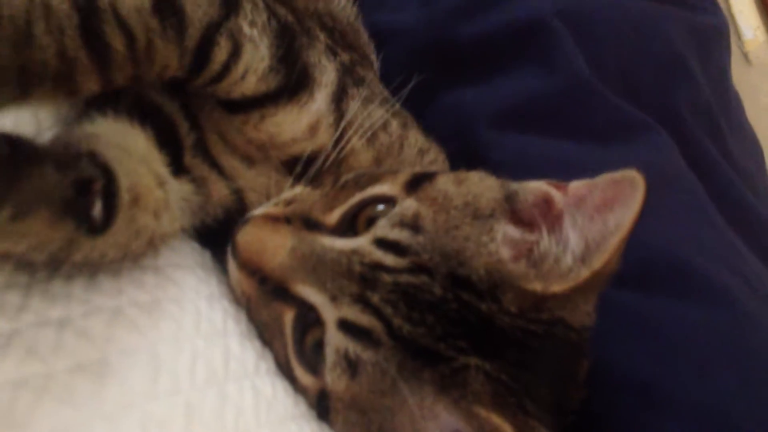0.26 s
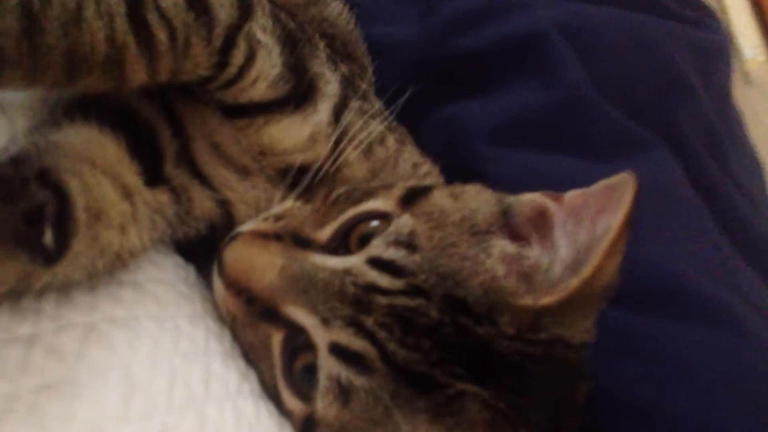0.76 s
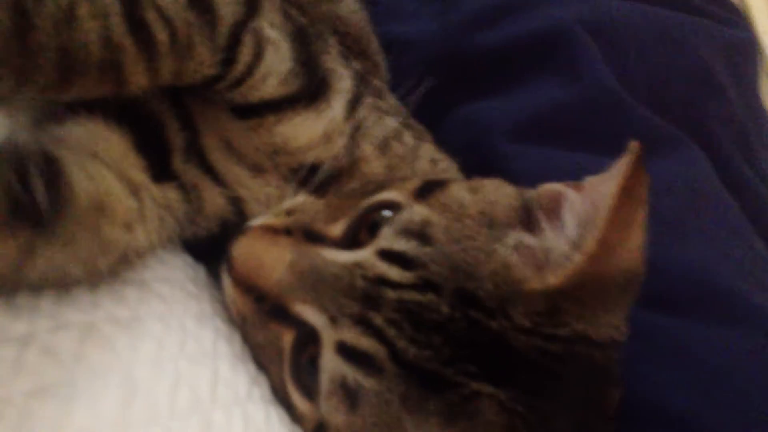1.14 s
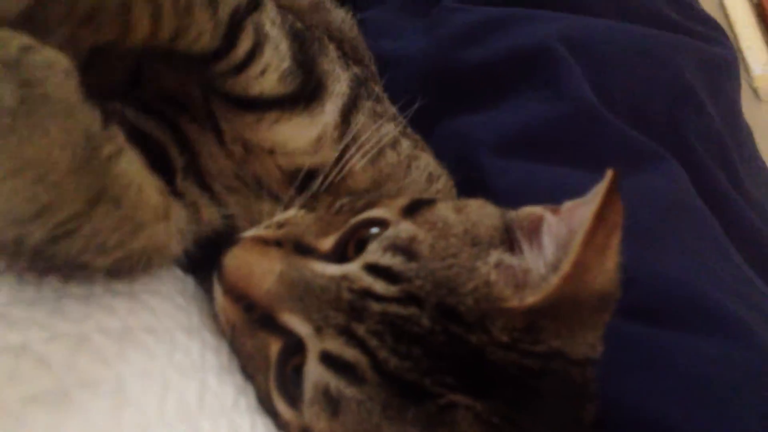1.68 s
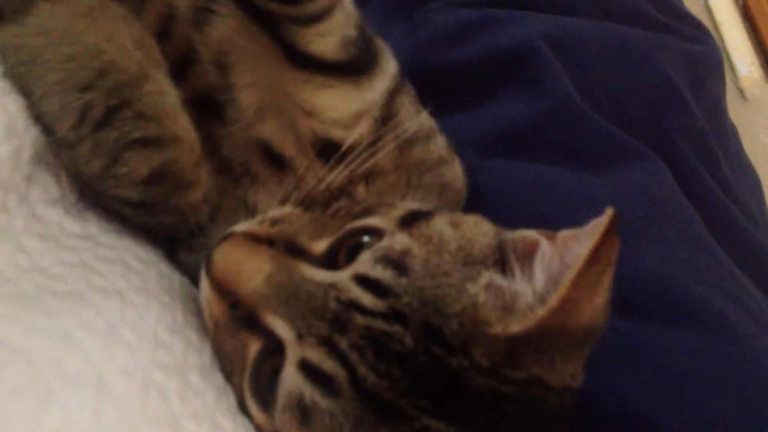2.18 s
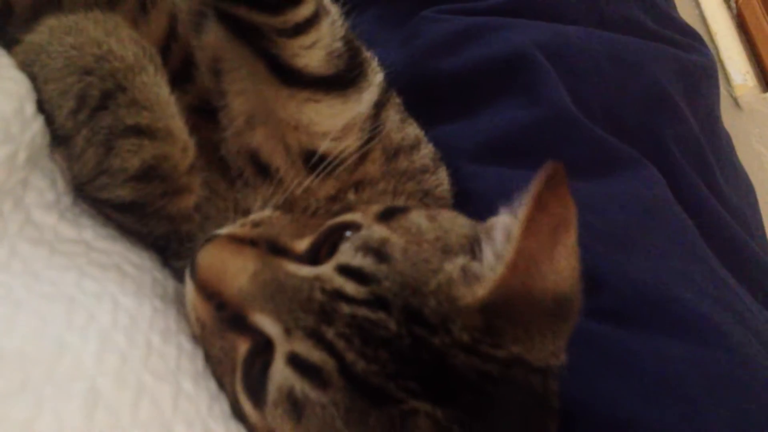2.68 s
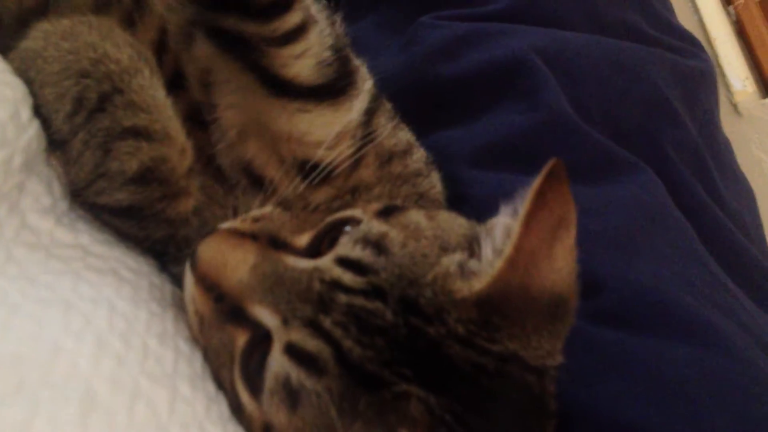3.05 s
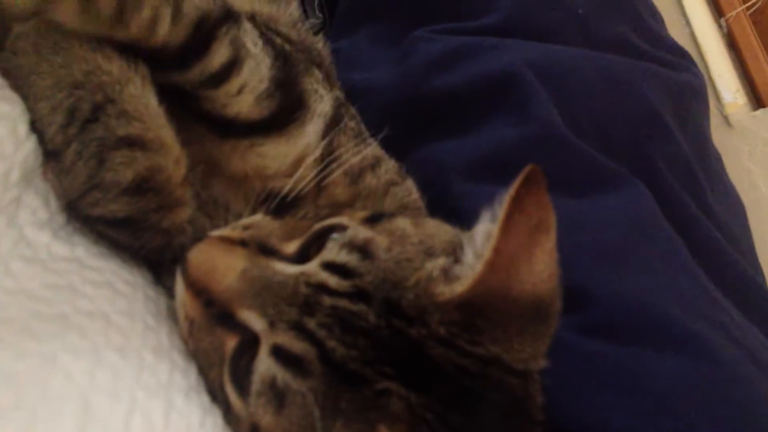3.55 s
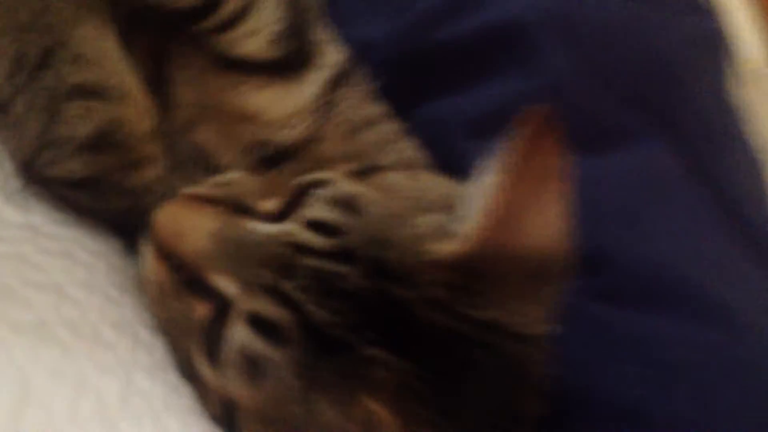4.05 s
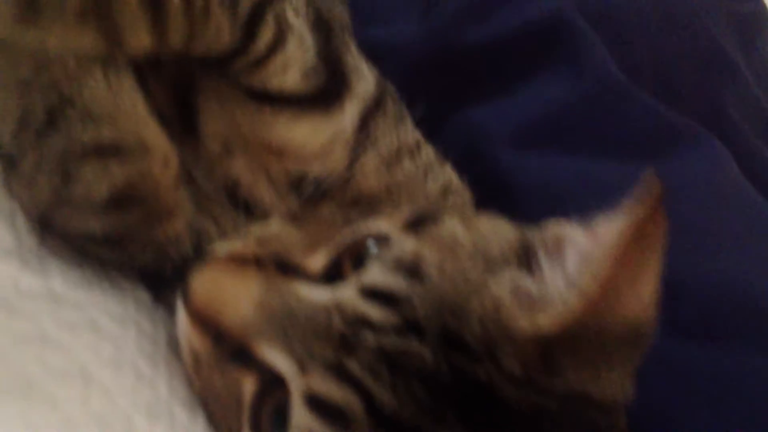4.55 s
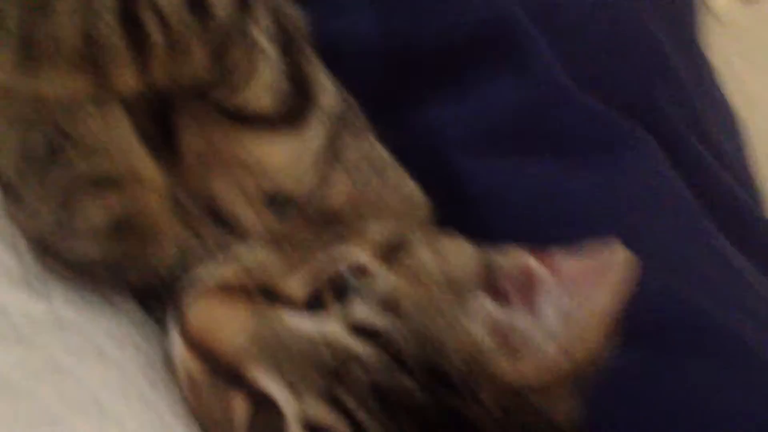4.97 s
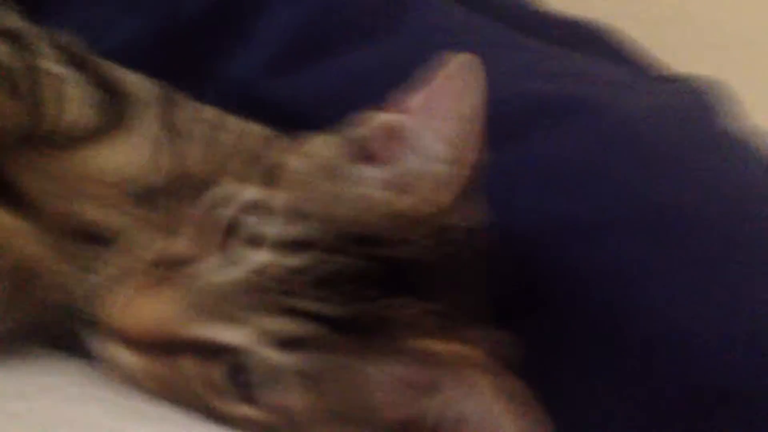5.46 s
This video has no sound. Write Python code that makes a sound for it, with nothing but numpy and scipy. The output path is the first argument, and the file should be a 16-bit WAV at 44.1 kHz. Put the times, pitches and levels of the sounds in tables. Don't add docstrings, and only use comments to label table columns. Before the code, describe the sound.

A kitten purrs steadily close up on a bed while seven sharp dry clicks run by, then a loud hard plastic knock rattles near the end.

```python
import sys
import numpy as np
from scipy import signal
from scipy.fft import rfft, irfft, next_fast_len
from scipy.io import wavfile
from scipy.ndimage import uniform_filter1d, map_coordinates

SR = 44100
rng = np.random.default_rng(int(sys.argv[2]) if len(sys.argv) > 2 else 0)


def amplitude_ratio(level_db):
    exponent = np.asarray(level_db, float) / 20
    return 10 ** exponent


def wav_out(sig):
    wavfile.write(sys.argv[1], SR, np.round(np.clip(np.atleast_2d(sig).T, -1, 1) * 32767).astype(np.int16))


N = 252428


def unit(x):
    return x / np.sqrt(np.mean(x ** 2) + 1e-20)


def unit_gain(y, x):
    return unit(y) * np.sqrt(np.mean(x ** 2))


def along(points, hz):
    f, v = np.transpose(points)
    return np.interp(np.log(hz + 1), np.log(f + 1), v)


def at(rows, times):
    s, *cols = np.transpose(rows)
    return [np.interp(times, s, c) for c in cols]


def filtered(x, response):
    m = next_fast_len(N + SR // 2)
    return irfft(rfft(x, m) * response(np.fft.rfftfreq(m, 1 / SR)), m)[..., :N]


def tract(peaks):
    return lambda f: sum((-1) ** k * amplitude_ratio(db) * 1j * f * w / (c * c - f * f + 1j * f * w)
                         for k, (c, w, db) in enumerate(peaks))


def cavity(peaks):
    return lambda f: sum((-1) ** k * amplitude_ratio(db) * c * w / (c * c - f * f + 1j * f * w)
                         for k, (c, w, db) in enumerate(peaks))


def pulses(times, sizes):
    return np.bincount(np.clip(times * SR, 0, N - 1).astype(int), sizes, N)


def ring(modes, t):
    x = 0
    for hz, t60, db in modes:
        decay = amplitude_ratio(db + rng.normal(0, 2) - 60 * t / t60)
        x = x + decay * np.sin(2 * np.pi * hz * rng.normal(1, .025) * t)
    return x / np.abs(x).max()


def add(out, s, x):
    out[round(s * SR):][:len(x)] += x


# (first throat cycle [s], throat rate [cycles per s], voiced length [s], roughness [0-1])
BREATHS = [
    (.0293, 27.97, .36, .15),
    (.4968, 30.67, .59, .25),
    (1.1505, 29.36, .58, .17),
    (1.829, 30.6, .52, .3),
    (2.451, 30.05, .47, .17),
    (3.0768, 31.5, .5, .55),
    (3.6548, 29.35, .48, .15),
    (4.2632, 31.04, .51, .65),
    (4.8736, 28.99, .46, .5),
    (5.5604, 28.3, .3, .5),
]
# (effort at start [dB], effort at end [dB], snap over thump [dB], nasal edge [dB])
VOICE = [(-66, -64, -6, -5), (-74, -70.5, -2, -2), (-65.5, -64, -5.5, -6), (-80, -76, 0.5, -6),
         (-63.5, -68.5, -3.5, -16), (-64, -71.5, -6.5, -2.5), (-68, -62, -4, -18), (-63.5, -64, -7, -2),
         (-64, -59, -9, -15), (-66.5, -60, -5, -7)]


def breathing():
    attack_s, release_s, pause_db = 0.025, 0.042, -18
    onset_snap_db = -2
    rows, shut = [], []
    for k, (breath, voice) in enumerate(zip(BREATHS, VOICE)):
        s, rate, length, rough = breath
        first_db, last_db, snap_db, edge_db = voice
        turn = BREATHS[k + 1][0] if k + 1 < len(BREATHS) else N / SR
        shut.append(np.arange(s, turn - .5 / rate, 1 / rate))
        corners = [(s - attack_s, first_db + pause_db),
                   (s, first_db),
                   (s + length, last_db),
                   (min(s + length + release_s, turn - attack_s), last_db + pause_db)]
        for when, db in corners:
            firm_db = db + snap_db + onset_snap_db * (when <= s)
            rows.append((when, (-1) ** k, rough, db, firm_db, edge_db))
    return rows, np.concatenate(shut)


# (frequency [Hz], width [Hz], level [dB])
CHEST = [(219.3, 105, 0), (313, 95, -2.5)]
THROAT = [(613, 626, 0), (891, 350, -7.5)]
NOSE = [(1204, 230, -6), (1750, 670, -0.5)]
# (time [s], snap level [dB], thump relative to snap [dB])
FLAPS = [(0.238, -53, -8), (0.347, -53, -5), (2.459, -54.5, 1), (2.514, -50, -14), (3.063, -46, -29),
         (3.075, -57, -2), (3.155, -60, -11), (3.281, -49.5, -15), (3.317, -50.5, -4), (4.285, -57, 3),
         (4.312, -47, -3), (4.344, -52, -13), (4.47, -48, -5), (4.499, -50.5, -9), (4.576, -51, -4),
         (4.599, -51.5, -6), (4.625, -57, 2), (4.734, -53, -1), (5.275, -54, -2), (5.291, -42.5, -3),
         (5.306, -46, -15), (5.355, -46, -13), (5.588, -56, -19), (5.613, -52, -19)]


def purr():
    rows, shut = breathing()
    flow, rough = at(rows, shut)[:2]
    d = rng.uniform(-1, 1, (len(shut), 8))
    part = shut - .0132 + .0007 * d[:, 0]
    shut = shut - .0012 + (.0005 + .0015 * rough) * d[:, 1]
    stray = shut + .011 + .007 * d[:, 2]
    size = amplitude_ratio((2.2 + 3 * rough[:, None]) * d[:, 3:7]).T
    slip = pulses(stray, 1.2 * rough * d[:, 7])
    soft = pulses(part, flow * size[0]) - 0.55 * pulses(shut, flow * size[1]) + slip
    hard = 0.5 * pulses(part, flow * size[2]) - pulses(shut, flow * size[1]) + slip
    edge = pulses(shut, size[3] * size[1]) + 0.72 * pulses(part, size[0]) + slip
    thump_db, snap_db, edge_db = at(rows, np.arange(N) / SR)[2:]

    when, flap_db, low_db = np.transpose(FLAPS)
    nasal_db = np.where(at(rows, when)[0] > 0, -20, -13)
    when = when + .002
    soft = amplitude_ratio(thump_db + 25.5) * unit(soft) - pulses(when, amplitude_ratio(flap_db + low_db + 42))
    hard = amplitude_ratio(snap_db + 20) * unit(hard) - pulses(when, amplitude_ratio(flap_db + 32))
    edge = amplitude_ratio(snap_db + edge_db + 8.5) * unit(edge) + pulses(when, amplitude_ratio(flap_db + nasal_db + 28.5))

    puff = uniform_filter1d(np.abs(edge), size=300) * rng.standard_normal(N)
    edge = 0.55 * edge + 20 * puff
    thump = filtered(soft, cavity(CHEST))
    snap = filtered(hard, lambda f: cavity(THROAT)(f) / (1 + 1j * f / 2200))
    return thump + snap + filtered(edge, cavity(NOSE))


# (time [s], peak level [dB], hollow pitch [Hz], hollow level [dB])
CLICKS = [
    [(1.1457, -36, 1050, -41), (1.1465, -15, 560, -39.5), (1.1506, -34, 670, -53)],
    [(1.299, -30, 1000, -39.5), (1.303, -26, 880, -52), (1.3052, -29, 700, -57)],
    [(1.4447, -28, 840, -39), (1.449, -19, 400, -42.5)],
    [(1.5822, -32, 900, -43.5), (1.5842, -27, 620, -47), (1.587, -25, 316, -40)],
    [(1.7188, -31, 1020, -41), (1.7223, -12, 800, -42)],
    [(1.8636, -27, 980, -36), (1.8682, -16.5, 554, -39)],
    [(2.0166, -33, 1184, -46), (2.0187, -31, 1140, -42.5), (2.0196, -32, 1190, -46),
     (2.0252, -40, 1160, -37)],
]
# (hiss level [dB], middle cavity level [dB], bright cavity pitch [ratio])
OPENING = [(-42, 2, .92), (-43, -0.5, .97), (-45, 1.5, .96), (-39, 2.5, 1.03), (-36, 2.5, 1.02),
           (-38, 5.5, 1.01), (-49, -1, 1.01)]
# (frequency [Hz], t60 [s], level [dB])
BRIGHT = [(7350, .0045, 0), (8900, .003, -2), (10600, .0025, -4), (13000, .0015, -13)]
MIDDLE = [(2150, .0035, -7), (2700, .005, 0), (4100, .003, -3)]
# (frequency [Hz], width [Hz], level [dB])
SPRAY = [(1120, 340, -3.5), (2970, 1200, -9), (7300, 1700, 1), (10350, 2700, 3.5)]


def clicks():
    build_s, hiss_s = .0002, .0052
    leak_db_per_s = -1100
    out, hiss, t = np.zeros(N + SR), np.zeros(N + SR), np.arange(SR // 25) / SR
    onset = np.minimum(t / .0001, 1)
    build = np.sin(np.pi / 2 * np.minimum(t / build_s, 1))
    for releases, (suction_db, cavity_db, pitch) in zip(CLICKS, OPENING):
        for s, db, hz, hollow_db in releases:
            cycles = 14.3 if hz > 1000 else 6.2
            hollow = amplitude_ratio(hollow_db - db - 60 * t * hz / cycles) * np.sin(2 * np.pi * hz * t)
            mid_db = cavity_db + 0.5 - 0.54 * (db + 36)
            middle = amplitude_ratio(mid_db) * ring(MIDDLE, t)
            bright = amplitude_ratio(-2.8) * build * ring(BRIGHT, pitch * (t - build_s))
            add(out, s, amplitude_ratio(db + 2.5) * onset * (middle + hollow - bright))
            hiss_db = suction_db + leak_db_per_s * (s - releases[0][0])
            add(hiss, s, amplitude_ratio(hiss_db - 3 - 60 * (t / hiss_s) ** 4) * rng.standard_normal(len(t)))
    return out[:N] + unit_gain(filtered(hiss[:N], tract(SPRAY)), hiss[:N])


# (frequency [Hz], level [dB])
SPREAD = [(200, -41), (1000, -18), (2700, -5), (4500, 0.5), (5800, -7), (7400, 2), (10000, -3.5),
          (14000, -10)]


def sideways_clicks():
    s, db = np.concatenate(CLICKS).T[:2]
    return filtered(pulses(s, amplitude_ratio(db)), lambda f: amplitude_ratio(along(SPREAD, f)))


# (time [s], peak level [dB], thud level [dB])
KNOCK = [
    (5.4743, -7, -33),
    (5.478, -20.5, 2),
    (5.4826, -13, -3.5),
    (5.488, -22, -5.5),
    (5.4901, -19, -18),
    (5.4966, -17, -18),
    (5.5035, -28, 1),
]
# (frequency [Hz], t60 [s], level [dB])
CASE = [(1560, .016, -7), (2150, .009, -3), (2830, .011, 0), (3220, .01, -1), (4300, .009, -3),
        (7200, .003, -17), (10500, .002, -20)]
THUD = [(196, 0.024, -5.5), (267.7, 0.045, 2.5), (420, 0.017, -20), (677, 0.0094, -5.5), (1120, 0.01, -2.5)]
# (time [s], peak level [dB], body pitch [Hz], edge pitch [Hz])
TICKS = [
    (0.5485, -44.5, 695, 2600),
    (2.7, -69, 8500, 9500),
    (3.47, -62.5, 7300, 7000),
    (3.555, -59, 8000, 9000),
    (4.8855, -47, 3500, 6500),
    (5.5357, -42.5, 4030, 7400),
]


def knock():
    out, t = np.zeros(N + SR), np.arange(SR // 12) / SR
    onset = np.minimum(t / 0.00052, 1)
    for s, db, thud_db in KNOCK:
        scrape = uniform_filter1d(uniform_filter1d(rng.standard_normal(len(t)), size=5), size=4)
        scrape = 0.2 * amplitude_ratio(-60 * t / 0.027) * scrape
        case = amplitude_ratio(-3.5) * ring(CASE, t - .0004)
        thud = amplitude_ratio(thud_db - 1.5) * ring(THUD, t)
        add(out, s, amplitude_ratio(db) * (case + thud + scrape) * onset)
    for s, db, *pitches in TICKS:
        for hz in pitches:
            add(out, s, -amplitude_ratio(db + 5 - 60 * t * hz / 2.9) * np.sin(2 * np.pi * hz * t))
    return out[:N]


# (peak time [s], level [dB], 20 dB rise [s], 20 dB fall [s], fineness [dB])
STROKES = [
    (2.22, -75.5, 0.4, 0.15, 5.5),
    (4.89, -75, 0.13, .9, 2),
    (5.09, -67, 0.16, .2, -2.5),
    (5.23, -70, 0.2, 0.04, 3.5),
    (5.31, -75, .5, 0.3, -3),
]
# (frequency [Hz], level [dB per Hz])
CLOTH = [(250, -120), (400, 4), (800, 2.5), (1450, -4), (1580, 6), (1720, -4), (2450, -4.5), (3200, -7),
         (4400, 2.5), (5800, -12), (7300, -6.5), (10000, -23.5), (13000, -17), (16500, -24)]
# (from [Hz], to [Hz])
SCALES = [(0, 3200), (3200, 8000), (8000, 20000)]


def rustle():
    t = np.arange(N) / SR
    end = STROKES[-1][0] + STROKES[-1][3]

    def swell(tilt):
        power = 0
        for s, db, rise, fall, fine_db in STROKES:
            away = np.where(t < s, (s - t) / rise, (t - s) / fall)
            power = power + amplitude_ratio(db + tilt * fine_db - 20 * away) ** 2
        return np.sqrt(power * (t < end))

    clumps = amplitude_ratio(1.5 * map_coordinates(rng.standard_normal(N // 300 + 4), [np.arange(N) / 300]))
    slips = clumps * rng.standard_normal(N) * amplitude_ratio(4 * rng.standard_normal(N))
    out = 0
    for (low, high), db, tilt in zip(SCALES, (6, 2.5, -2.5), (-1.2, 0, 1)):
        band = filtered(slips, lambda f: amplitude_ratio(along(CLOTH, f)) * (f >= low) * (f < high))
        out = out + amplitude_ratio(db) * swell(tilt) * unit(band)
    return out


# (frequency [Hz], t60 [s])
BEDROOM = [(200, 0.27), (2000, 0.45), (7000, 0.31), (14000, 0.24)]


def bedroom(x):
    out = np.zeros(N + SR)
    for a in range(0, N, SR // 7):
        hz, t, z = signal.stft(rng.standard_normal(SR // 2), SR, nperseg=256)
        decay = amplitude_ratio(-60 * t / along(BEDROOM, hz)[:, None])
        tail = signal.istft(z * decay, SR, nperseg=256)[1]
        echoes = signal.fftconvolve(x[a:a + SR // 7], tail / np.linalg.norm(tail))
        add(out, a / SR + .006, echoes)
    return out[:N]


# (frequency [Hz], level [dB per Hz])
HISS = [(15, -70), (25, -36), (43, -28.5), (69, -20), (193, 0), (322, -5), (433, -18), (703, -12.5),
        (1140, -17), (1800, -20), (2420, -20.5), (7910, -22), (9810, -28.5), (13900, -23.5), (15500, -25)]


def background():
    return amplitude_ratio(-67.9) * unit(filtered(rng.standard_normal(N), lambda f: amplitude_ratio(along(HISS, f))))


def scene():
    low_cut_hz = 127.3
    run, cat = clicks(), purr()
    hollow = filtered(run, lambda f: 1 / (1 + (f / 1500) ** 6))
    to_room = amplitude_ratio(-23) * run + amplitude_ratio(-17) * cat + amplitude_ratio(-15.5) * hollow + amplitude_ratio(-1.5) * sideways_clicks()
    mix = run + cat + knock() + rustle() + bedroom(to_room)
    near = filtered(mix, lambda f: (1j * f / (1j * f + low_cut_hz)) ** 4)
    return (near + background())[None]


def roll_off(x):
    return signal.sosfilt(signal.butter(12, 16500, fs=SR, output="sos"), x)


def record(dry):
    band_hz = 15500
    mix = filtered(dry, lambda f: np.where(f < band_hz, 1, amplitude_ratio(-22) * (f < band_hz + 1000)))
    return roll_off(mix)


dry = scene()
out = record(dry)
wav_out(out)
```